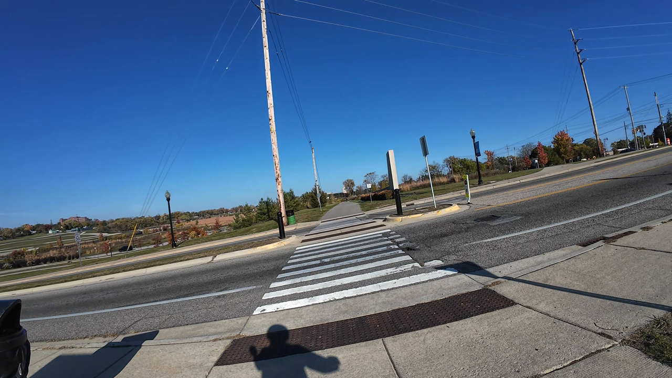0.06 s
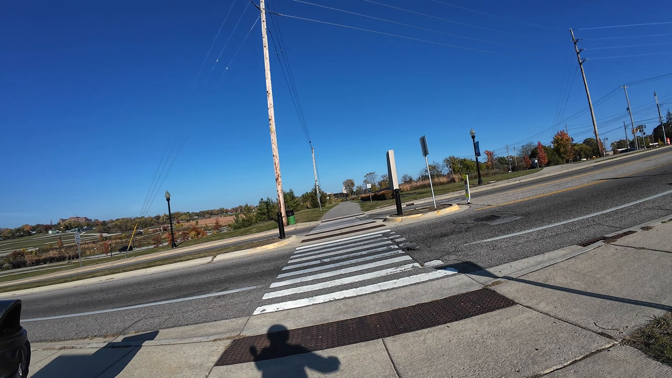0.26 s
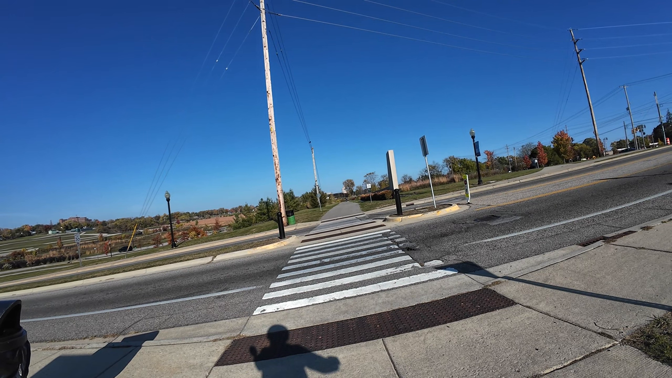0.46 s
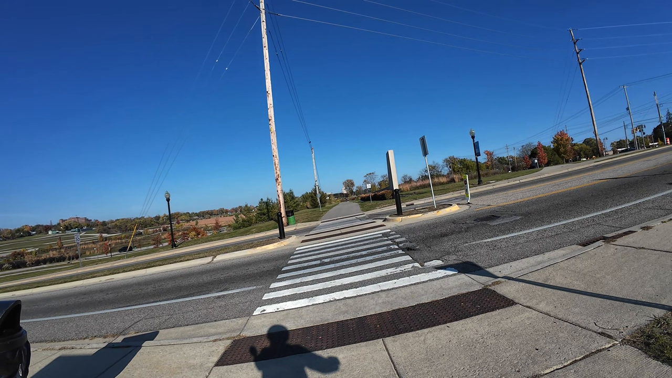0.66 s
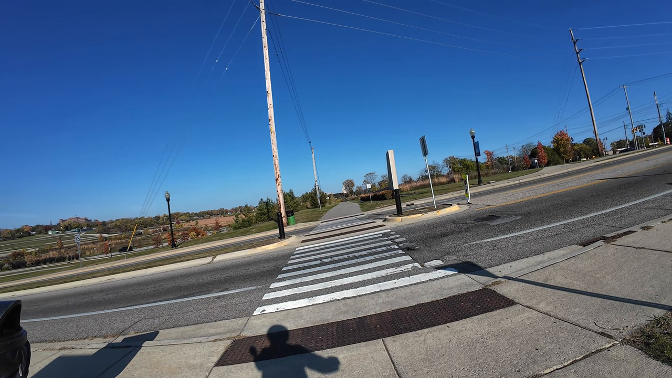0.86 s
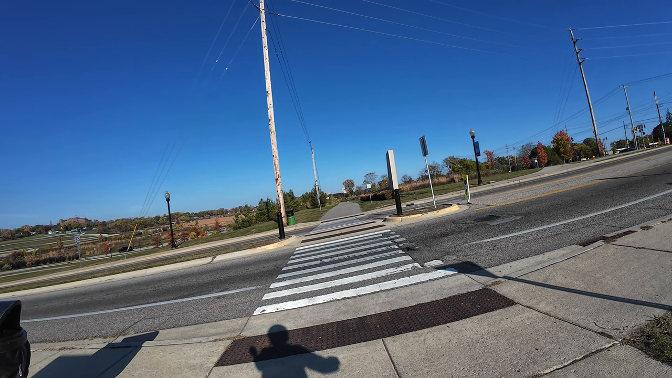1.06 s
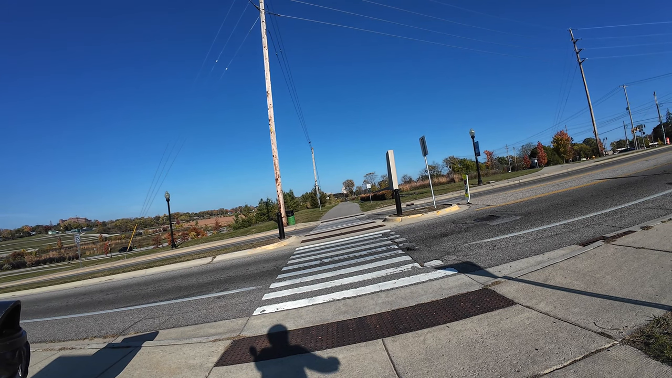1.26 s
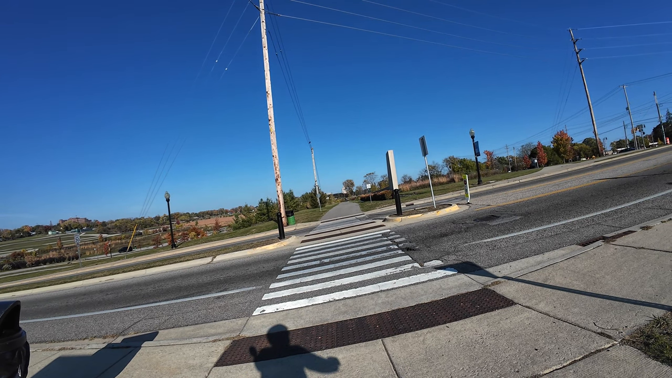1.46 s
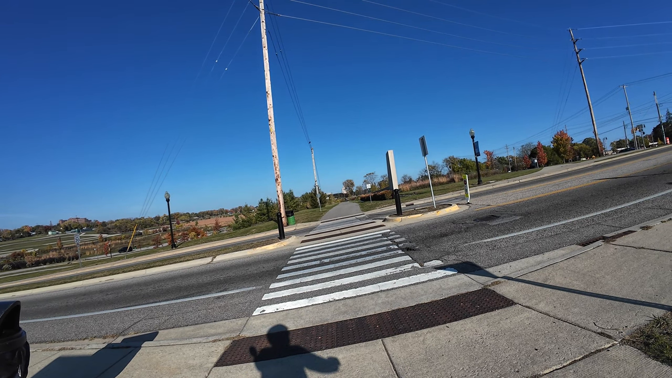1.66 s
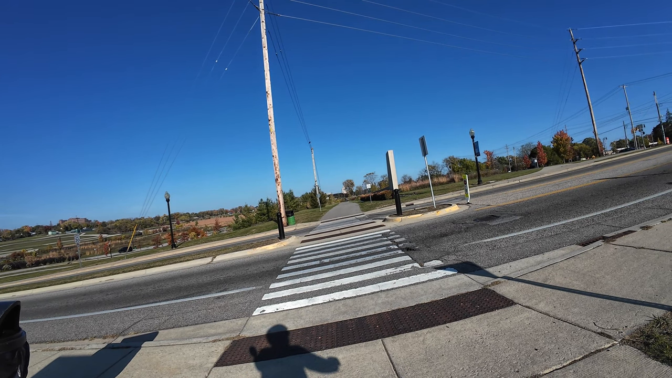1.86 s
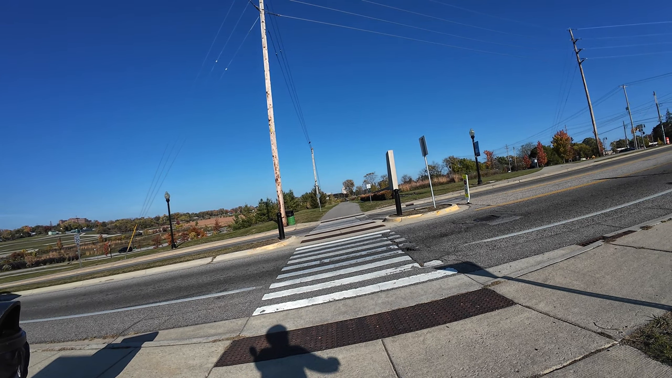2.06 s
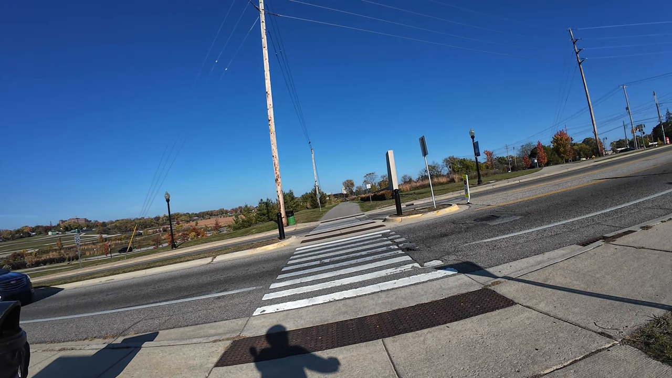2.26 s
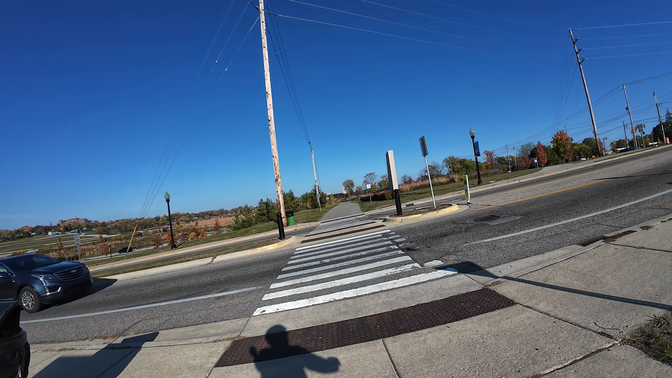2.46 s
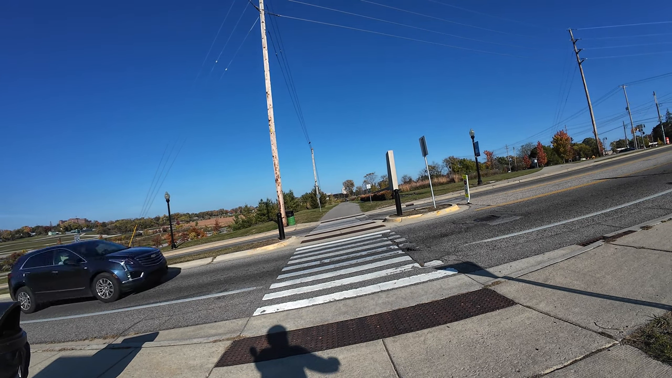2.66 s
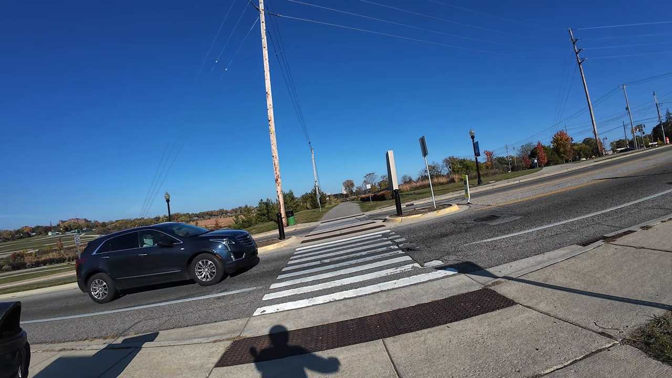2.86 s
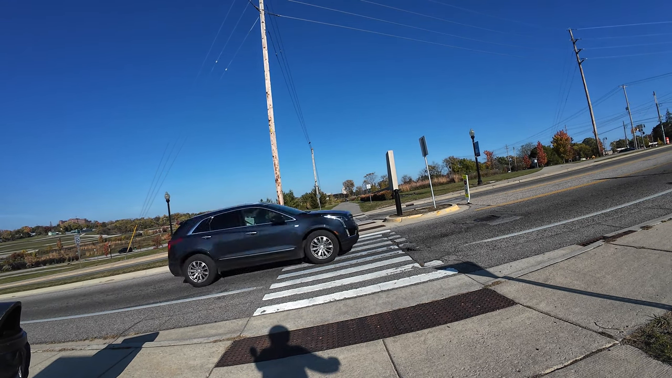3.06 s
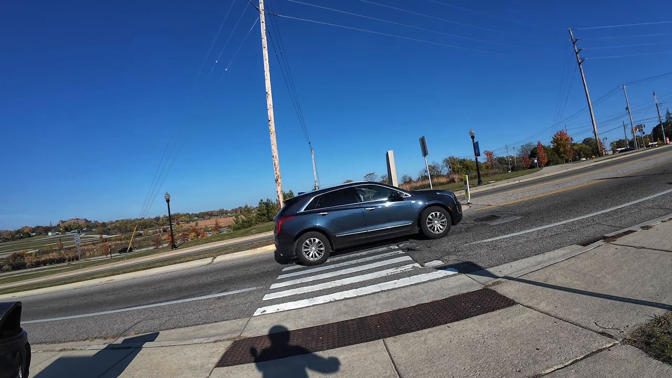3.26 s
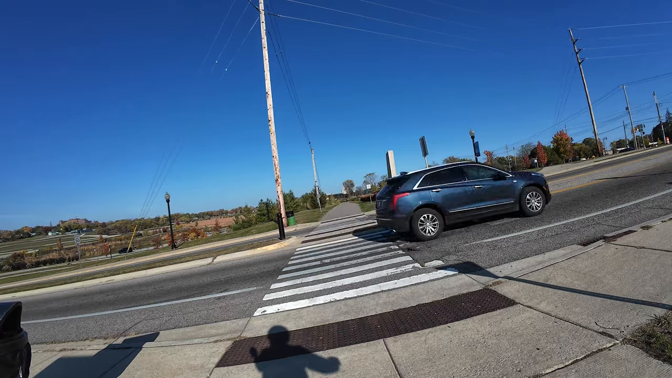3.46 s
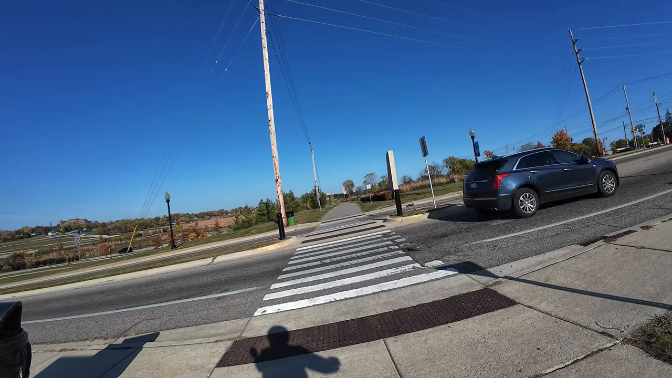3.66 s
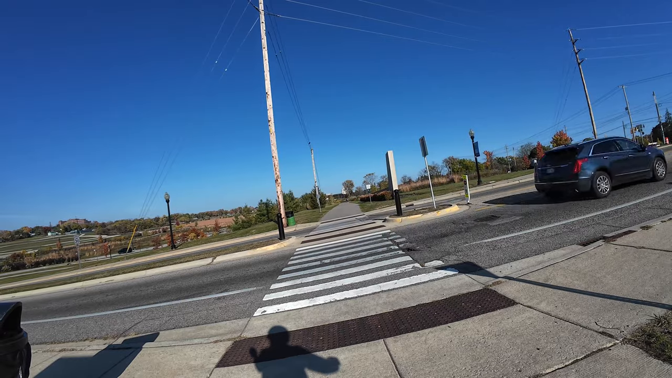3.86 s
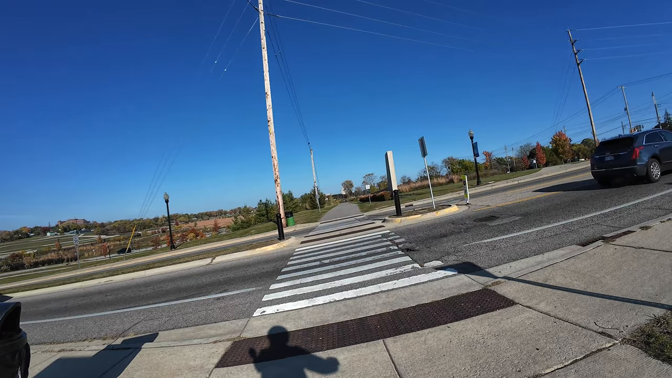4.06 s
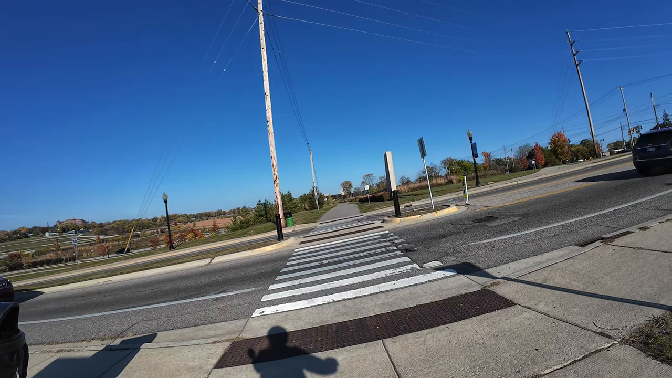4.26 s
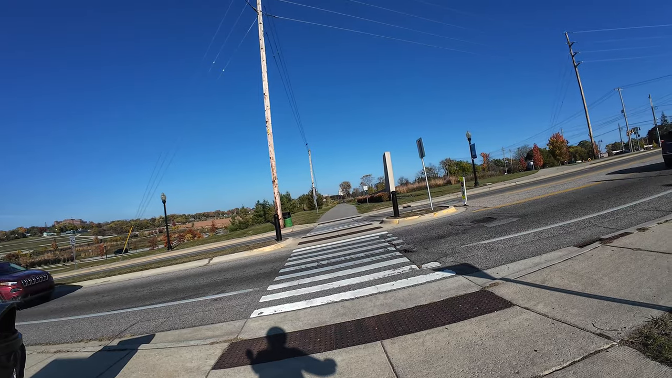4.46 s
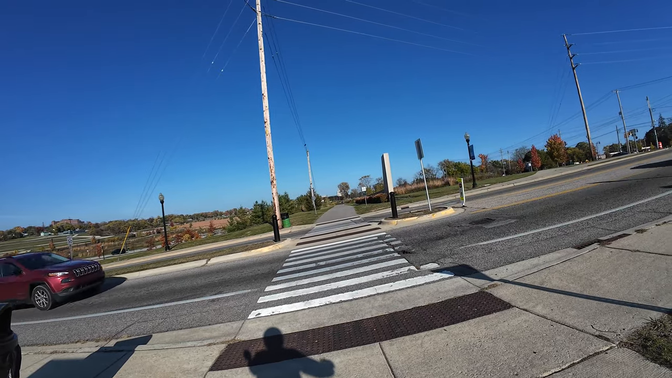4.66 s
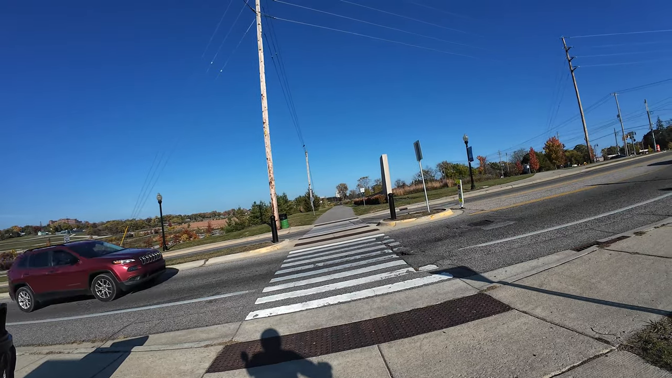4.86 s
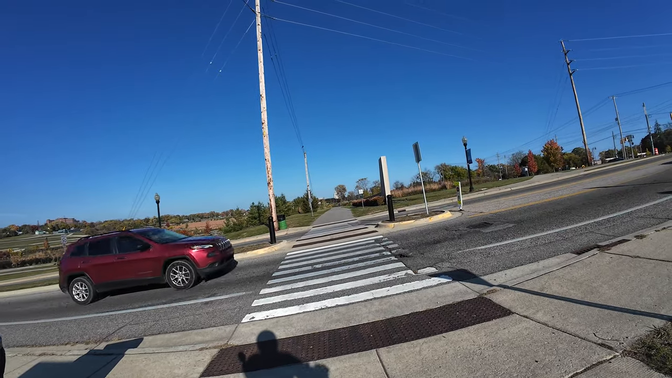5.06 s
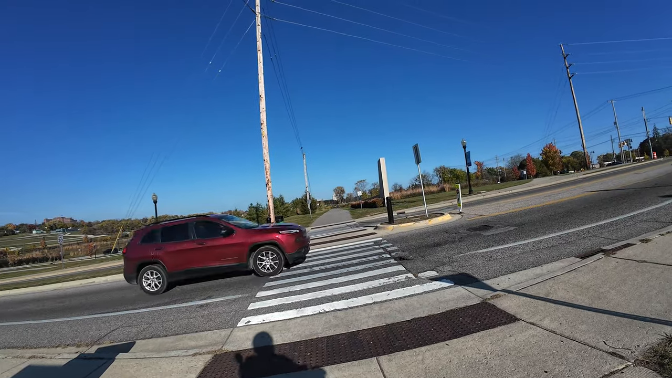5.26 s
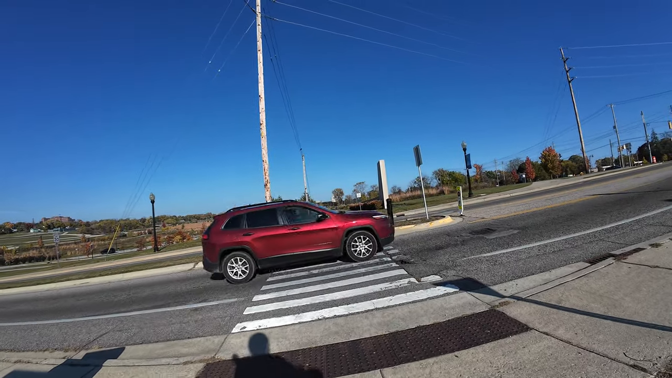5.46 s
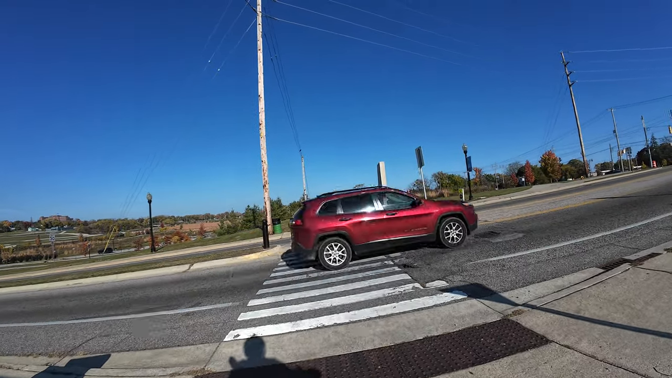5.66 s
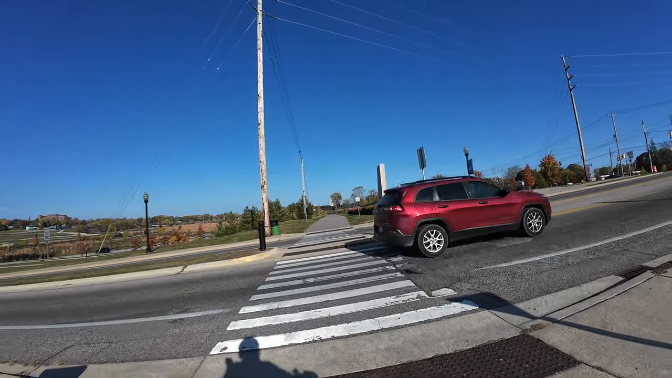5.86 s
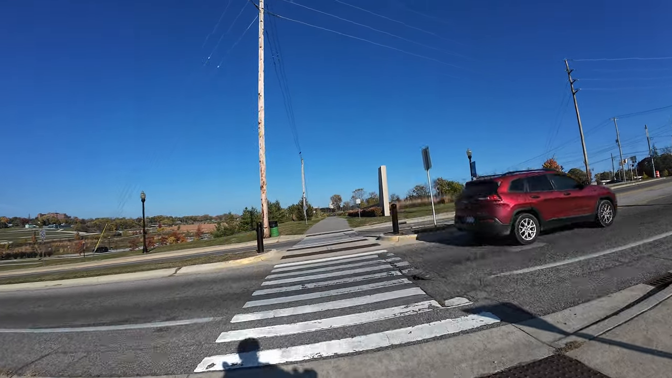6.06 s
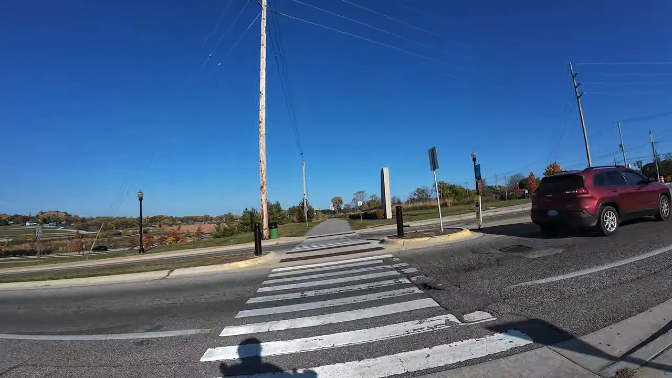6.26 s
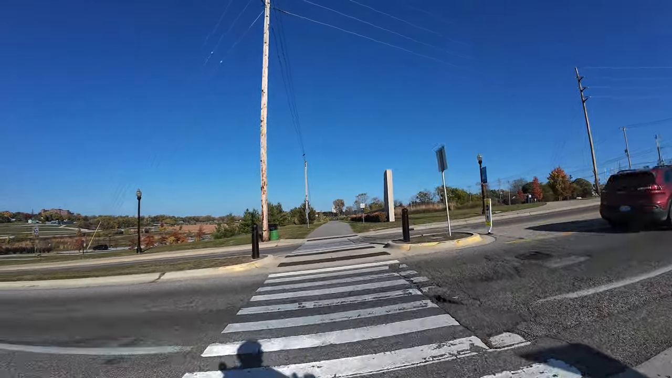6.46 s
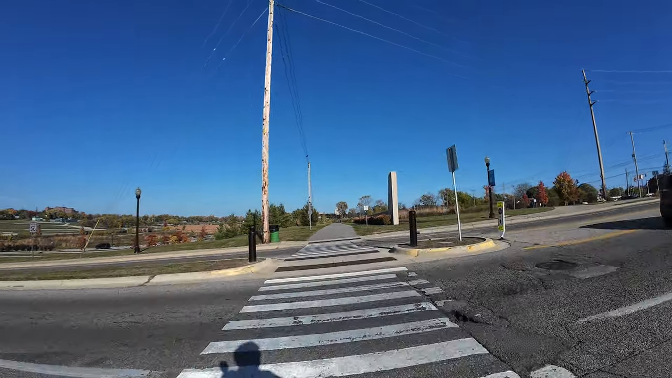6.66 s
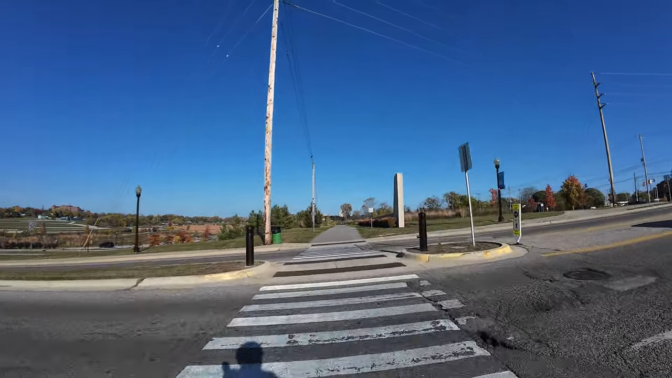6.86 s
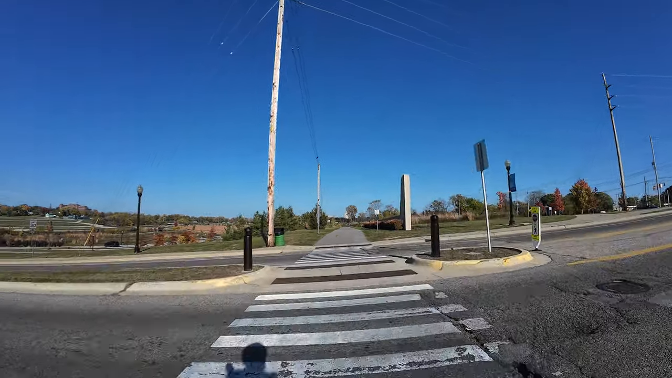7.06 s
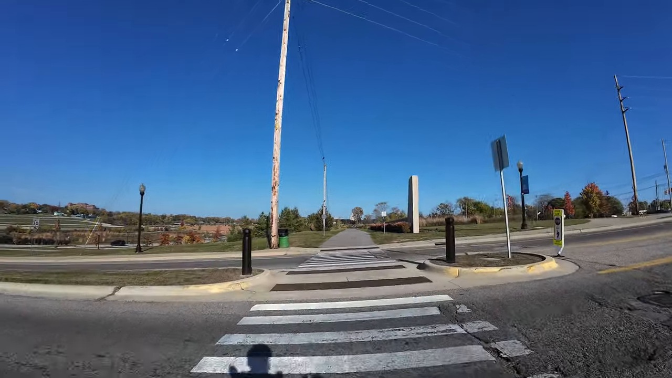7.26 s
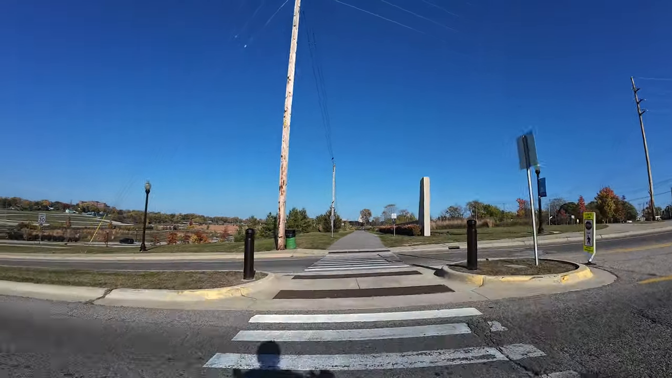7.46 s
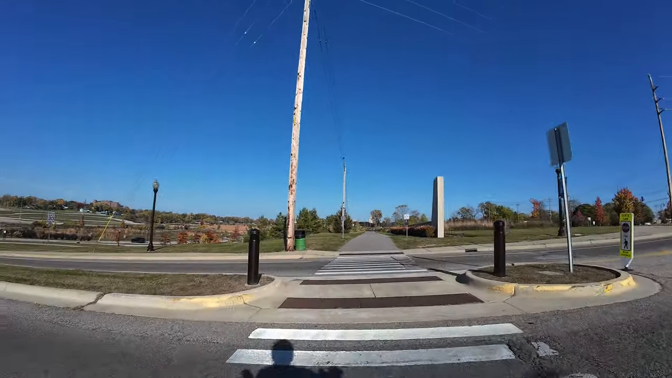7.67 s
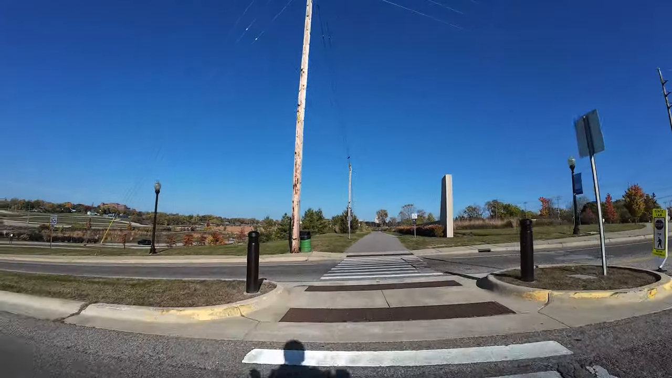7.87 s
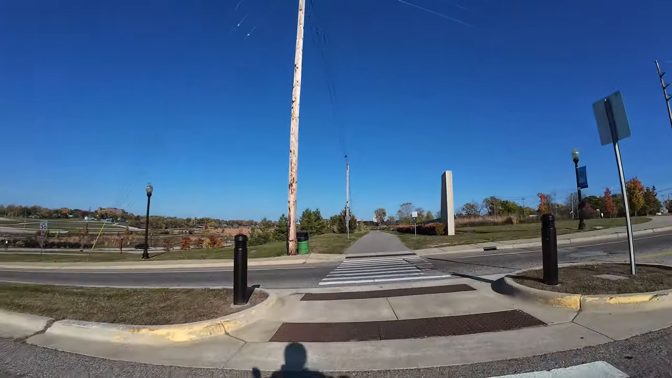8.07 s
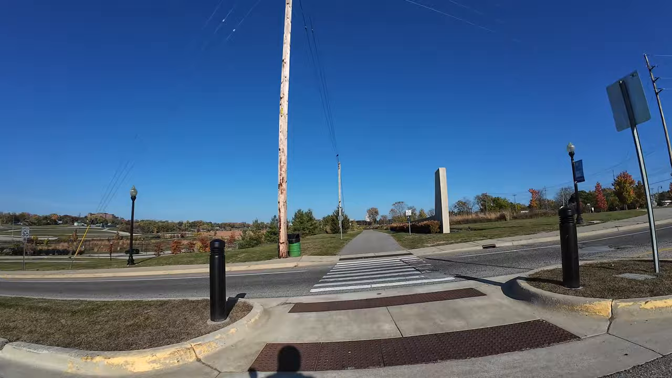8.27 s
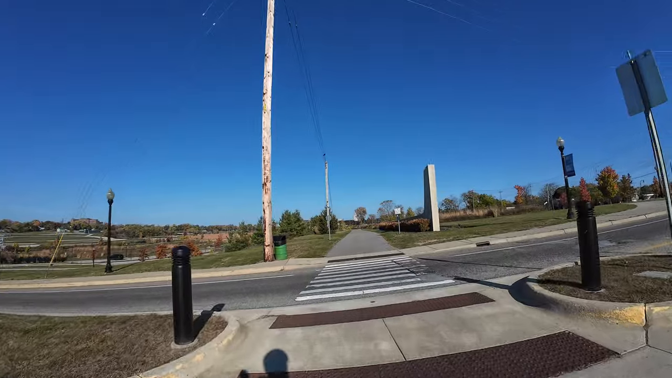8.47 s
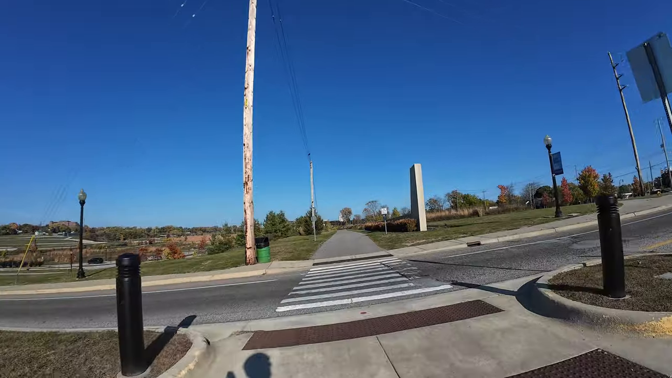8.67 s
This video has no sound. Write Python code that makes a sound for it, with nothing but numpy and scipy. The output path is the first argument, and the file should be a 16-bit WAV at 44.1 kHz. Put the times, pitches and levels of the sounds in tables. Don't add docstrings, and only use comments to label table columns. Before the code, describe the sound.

Two cars swish past left to right over a thumping road seam, then a bike rolls off with motor whine, tyre hum and throbbing wind.

```python
import sys
import numpy as np
from scipy import signal
from scipy.fft import rfft, irfft, next_fast_len
from scipy.io import wavfile
from scipy.ndimage import map_coordinates

SR = 44100
rng = np.random.default_rng(int(sys.argv[2]) if len(sys.argv) > 2 else 0)


def output_pcm(signal):
    pcm = np.clip(np.atleast_2d(signal).T, -1, 1) * 32767
    wavfile.write(sys.argv[1], SR, np.round(pcm).astype(np.int16))


def invert_db(level):
    return 10 ** (np.asarray(level, dtype=float) / 20)


N = 384111
STEP_S = .005


def rms_one(x):
    return x / np.sqrt(np.mean(x ** 2) + 1e-20)


def coarse():
    return np.arange(0, N / SR + STEP_S, STEP_S)


def in_time(rows):
    s, *columns = np.transpose(rows)
    return [np.interp(np.arange(N) / SR, s, c) for c in columns]


def while_on(rows, fade_s=0.1):
    t = np.arange(N) / SR
    return np.clip(np.minimum(t - rows[0][0], rows[-1][0] - t) / fade_s + .5, 0, 1)


def at_hz(points, hz):
    point_hz, value = np.transpose(points)
    return np.interp(np.log(hz), np.log(point_hz), value)


def band(x, low_hz, high_hz, order=2):
    edges = [low_hz, min(high_hz, .45 * SR)]
    return signal.sosfilt(signal.butter(order, edges, "band", fs=SR, output="sos"), x)


def noise_band(low_hz, high_hz):
    return rms_one(band(rng.standard_normal(N), low_hz, high_hz))


def drift(rate):
    r = np.exp(-80 * np.pi * rate / SR)
    slow = signal.lfilter([1], [1, -2 * r, r * r], rng.standard_normal(N // 40 + 2002))[2000:]
    return np.interp(np.arange(N) / 40, np.arange(len(slow)), rms_one(slow))


def sine(hz):
    return np.sin(2 * np.pi * np.cumsum(hz) / SR)


def wavering(hz, width_hz):
    turn = np.exp(2j * np.pi * np.cumsum(hz) / SR)
    return rms_one(np.real(turn * (drift(width_hz) + 1j * drift(width_hz))))


def glides(rows):
    out = np.zeros(N)
    for s, length, from_hz, to_hz, db in rows:
        n = round(length * SR)
        out[round(s * SR):][:n] += invert_db(db) * np.hanning(n) * sine(np.geomspace(from_hz, to_hz, n))
    return out


def delayed(x, samples):
    return map_coordinates(x, [np.arange(N) - samples], order=3, mode="nearest")


def two_ports(pair, lag):
    return np.array([delayed(pair[0], lag / 2), delayed(pair[1], -lag / 2)])


# moment abreast of the microphone in seconds, speed in m/s,
# lane distance in m, extra lateness of the three lower layers in seconds.
CARS = [
    (-.02, 27.4, 3.06, .01),
    (3.3, 9.12, 6.04, .01),
    (5.65, 8.75, 6.72, .2),
    (8.8, 16, 9.7, 0.012),
]


def along(car, after_s=0):
    s, speed, lane, _ = CARS[car]
    return (coarse() - s - after_s) * speed / lane


# body, roar, song, swish and hiss level, all in dB.
CAR_DB = [
    (-47.5, -33.5, -46, -48, -86.5),
    (-39.5, -28, -38.5, -40.5, -63.5),
    (-32, -30.5, -35.5, -41, -62),
    (-45, -45.5, -41, -58.5, -89),
]
# loudest after abreast in seconds, loss coming and loss going
# in dB per doubled distance, distant traffic level in dB.
LAYERS = [
    (.25, 11, 4.7, -45.5),
    (0.09, 8, 6.1, -51.5),
    (0.23, 3.5, 12.8, -51),
    (-0.059, 8, 10.7, -61),
    (0.093, 12.5, 12, -95.5),
]
HALF_LENGTH_M = 0.63
BODY, ROAR, SONG, SWISH, HISS = range(5)


def car_power(car, layer):
    after_s, coming_db, going_db, _ = LAYERS[layer]
    _, _, lane, late_s = CARS[car]
    x = along(car, after_s + late_s * (layer in (BODY, ROAR, SONG)))
    gap = np.maximum(np.abs(x) - HALF_LENGTH_M / lane, 0)
    doublings = np.log2(1 + gap ** 2) / 2
    return invert_db(2 * (CAR_DB[car][layer] - np.where(x < 0, coming_db, going_db) * doublings))


# start in seconds, level in dB.
RUMBLES = [
    (3.32, -30),
    (3.56, -31.5),
    (5.65, -30),
    (5.89, -28),
]
RUMBLE_FALL_DB_PER_S = 32
# level in dB of body, roar, song, swish and hiss.
ROLL_DB = (-38.5, -45.5, -55, -62.5, -75.5)
ROLL_FROM_S, ROLL_UP_S = 4.7, 0.37


def traffic_db():
    t = coarse()
    rolling = np.clip((t - ROLL_FROM_S) / ROLL_UP_S, 0, 1)
    power = []
    for layer in range(len(LAYERS)):
        cars = sum(car_power(car, layer) for car in range(len(CARS)))
        power.append(cars + invert_db(2 * LAYERS[layer][-1]) + rolling * invert_db(2 * ROLL_DB[layer]))
    for s, db in RUMBLES:
        power[BODY] += invert_db(2 * (db - RUMBLE_FALL_DB_PER_S * (t - s))) * (t > s)
    return in_time(np.transpose([t, *(10 * np.log10(power))]))


PORT_LAG_SAMPLES = 2.4


def bearings():
    lags = [PORT_LAG_SAMPLES * x / np.hypot(1, x) for x in (along(1), along(2))]
    first, second = car_power(1, SWISH), car_power(2, SWISH)
    return in_time(np.transpose([coarse(), *lags, second / (first + second)]))


def rolling_noise(first_lag, second_lag, share):
    first, second, loose = rng.standard_normal((3, N))
    first_gain, second_gain = np.sqrt(1 - share), np.sqrt(share)
    left = first_gain * delayed(first, first_lag) + second_gain * delayed(second, second_lag)
    return np.array([left, first_gain * first + second_gain * second, loose])


# frequency in Hz, level in dB per Hz.
TYRES = [(70, -12), (180, -5.5), (330, -10), (560, -9.5), (800, -6), (1150, -8), (1650, -12), (2150, -20),
         (3000, -25.5), (5000, -36.5), (7000, -48.5), (8200, -44.5), (11500, -45.5), (14800, -52.5)]
# low edge in Hz, high edge in Hz.
LAYER_HZ = [
    (100, 400),
    (450, 1200),
    (1250, 1800),
    (1900, 4000),
    (5500, 7400),
]
# frequency in Hz, left-right likeness from 0 to 1.
LIKENESS = [(300, .999), (800, 0.98), (1500, 0.95), (2500, 0.99), (4000, 0.86), (9000, 0.87)]
# time in seconds, first ridge in Hz, strength from 0 to 1.
ROAD_ECHO = [(0, 905, 0.13), (1.2, 796, 0.19), (3.2, 845, 0.11), (3.55, 710, 0.18), (4.1, 844, 0.08),
             (5.0, 973, 0.05), (5.9, 860, 0), (6.7, 920, 0), (7.3, 712, 0.15), (8.71, 910, 0.15)]
FAR_DULL_DB = 0.3


def tyre_roar(white, patchy_db, echo_cut_hz):
    layers_db = traffic_db()
    ridge_hz, echo = in_time(ROAD_ECHO)
    edges = 60 * 2 ** np.arange(0, 8.1, 1 / 3)
    hz = np.sqrt(edges[1:] * edges[:-1])
    level_db = at_hz(TYRES, hz) + 10 * np.log10(np.diff(edges))
    shift_db = []
    for db, (low_hz, high_hz) in zip(layers_db, LAYER_HZ):
        inside = (hz > low_hz) & (hz < high_hz)
        shift_db.append(db - 10 * np.log10(np.sum(invert_db(2 * level_db[inside]))))
    shift_db.append(shift_db[HISS] + FAR_DULL_DB * (layers_db[HISS] - layers_db[HISS].max()))
    place = np.interp(np.log(hz), np.log([200, 760, 1500, 2700, 6400, 10000]), np.arange(6))
    together, out = drift(3.6), 0
    for k, spot in enumerate(place):
        below = min(int(spot), 4)
        moved_db = shift_db[below] + (spot - below) * (shift_db[below + 1] - shift_db[below])
        *ports, loose = rms_one(band(white[k % 2], edges[k], edges[k + 1], order=3))
        alike = at_hz(LIKENESS, hz[k])
        gain = invert_db(level_db[k] + moved_db + patchy_db * (together / 2 + drift(8.4)))
        shared = np.sqrt((1 + alike) / 2) * np.array(ports)
        opposed = np.sqrt((1 - alike) / 2) * loose * np.array([[1], [-1]])
        out = out + gain * (shared + opposed)
    bounce = band(out, 89, echo_cut_hz, order=1)
    late = np.array([delayed(port, SR / ridge_hz) for port in bounce])
    return (out + echo * late) / np.sqrt(1 + echo ** 2)


# time in seconds, firing rate in Hz, level in dB.
ENGINE_ONE = [(2.8, 55.8, -38), (2.97, 56.1, -38.5), (3.12, 55.4, -35), (3.33, 55.9, -33.5),
              (3.59, 55.6, -25.5), (3.75, 55, -47)]
# time in seconds, firing rate in Hz.
ENGINE_TWO = [(5.15, 54.38), (5.41, 56.07), (5.63, 59.26), (5.71, 58.72), (6.05, 53.84), (6.34, 52.37),
              (6.6, 50.4)]
# multiple of the firing rate,
# loudest moment in seconds, level in dB, rise in dB/s, fall in dB/s.
BEAMS = [
    (1, 5.45, -27.5, 36, 3),
    (2, 5.71, -23.5, 250, 28),
    (3, 5.52, -29.5, 40, 8),
    (5, 5.47, -36.5, 35, 6),
    (6, 5.7, -31.5, 50, 54),
]


def engines():
    hz, db = in_time(ENGINE_ONE)
    out = while_on(ENGINE_ONE) * invert_db(db) * np.sqrt(2) * sine(hz)
    hz, = in_time(ENGINE_TWO)
    t = np.arange(N) / SR
    unsteady_hz = hz * (1 + 0.0041 * drift(6.5))
    for multiple, s, top_db, rise, fall in BEAMS:
        db = top_db - np.maximum(rise * (s - t), fall * (t - s))
        out += while_on(ENGINE_TWO) * invert_db(db) * np.sqrt(2) * sine(multiple * unsteady_hz)
    return out


# start in seconds, slap peak in dB, pitch in Hz,
# 60 dB decay in seconds, crack level in dB.
THUMPS = [(3.17, -10, 817, 0.032, -18), (3.317, -14.5, 440, 0.053, -15), (3.346, -12, 664, 0.048, -22),
          (3.532, -0.5, 426, 0.012, -13), (3.555, -10, 668, 0.057, -34), (5.641, -9, 369, 0.033, -20),
          (5.67, -16, 250, 0.025, -16), (5.715, -15, 385, 0.056, -35), (5.965, -12, 806, 0.037, -15)]


def thumps():
    out, t = np.zeros(N), np.arange(round(.15 * SR)) / SR
    crack = band(np.sin(2 * np.pi * t / 0.00085) * (t < .0009), 290, 2800)
    knock = invert_db(-20.0) * np.sin(2 * np.pi * 140 * t) * invert_db(-60 * t / 0.04)
    for s, db, hz, t60, crack_db in THUMPS:
        slap = np.sin(2 * np.pi * hz * t) * invert_db(-60 * t / t60) * (1 - np.exp(-t / 0.001))
        out[round(s * SR):][:len(t)] -= invert_db(db) * (slap + knock) + invert_db(crack_db) * crack
    return out


# centre in seconds, peak in dB, length in seconds.
GRIT = [(3.4, -50.5, 0.02), (3.542, -47, 0.0061), (3.65, -52, 0.02), (5.667, -45.5, 0.0096),
        (5.95, -39.5, 0.018), (6.134, -49, 0.01)]


def grit():
    t = np.arange(N) / SR
    swell = sum(invert_db(db) * np.exp(-.5 * ((t - s) / length) ** 2) for s, db, length in GRIT)
    spray = rms_one(band(rng.standard_normal((2, N)), 4500, 14500))
    return swell * (0.71 * spray[0] + .3 * spray[1] * np.array([[1], [-1]]))


# time in seconds, pitch in Hz, level in dB.
WHINE = [(6.03, 259, -38), (6.08, 263.5, -33.5), (6.244, 302.7, -28.5), (6.446, 334, -32.5),
         (6.572, 386, -33), (6.63, 395, -44), (6.7, 405, -55)]


def motor_whine():
    hz, db = in_time(WHINE)
    return while_on(WHINE) * invert_db(db) * np.sqrt(2) * sine(hz * (1 + 0.0053 * drift(21.8)))


# time in seconds, pitch in Hz, level in dB.
HUM = [(6.75, 190, -33), (7.0, 169.3, -36), (7.15, 188, -38.5), (7.32, 186, -29), (7.55, 186.3, -34),
       (7.84, 191, -30), (8.21, 183.4, -36), (8.41, 191, -34.5), (8.71, 190, -26)]


def knob_hum():
    hz, db = in_time(HUM)
    lines = 1.1 * sine(hz + 4.0 * drift(9.1)) + .55 * wavering(hz, width_hz=15.0)
    lines += 0.44 * wavering(.81 * hz, width_hz=3.5) + .4 * wavering(1.36 * hz, width_hz=14.0)
    return while_on(HUM, fade_s=0.69) * invert_db(db - 3.5) * lines


# start in seconds, peak in dB, low edge in Hz,
# high edge in Hz, 60 dB decay in seconds.
CLICKS = [(2.11, -76.5, 9450, 13600, .02), (6.4575, -21, 2157, 2424, 0.031),
          (6.4605, -25, 3840, 4540, 0.016), (6.459, -25.5, 2400, 5200, 0.066),
          (6.4605, -32.5, 6040, 10000, 0.02), (6.5473, -23.5, 1500, 4940, 0.018),
          (6.5445, -31.5, 7000, 13160, 0.017), (7.4446, -44, 2600, 5200, .03),
          (7.45, -35.5, 2600, 3720, 0.07), (7.635, -54, 7000, 12000, .01), (7.707, -50, 4500, 8040, 0.016),
          (7.85, -48, 2520, 4500, .015), (8.0, -53, 4000, 6500, 0.033), (8.308, -31.5, 6000, 11400, 0.0067),
          (8.321, -50, 7500, 11000, 0.0089), (8.334, -50, 7500, 11900, .01),
          (8.5675, -46, 2500, 6500, 0.028)]


def clicks():
    out, t = np.zeros((2, N)), np.arange(round(.08 * SR)) / SR
    for s, db, low_hz, high_hz, t60 in CLICKS:
        centre, spread = rng.standard_normal((2, len(t)))
        noise = centre + 0.29 * spread * np.array([[1], [-1]])
        burst = band(noise * invert_db(-60 * t / t60) * np.minimum(t / 0.0011, 1), low_hz, high_hz)
        start = round(s * SR)
        out[:, start:start + len(t)] += invert_db(db) * burst / np.abs(burst).max()
    return out


# centre in seconds, throb in dB, buffet in dB, half length in seconds.
GUSTS = [(0.39, -31, -27, 0.024), (0.763, -25.5, -25, 0.013), (.96, -27.5, -28, 0.092),
         (1.24, -33.5, -28.5, 0.093), (1.61, -25.5, -28, 0.024), (2.27, -36, -29, 0.34),
         (3.13, -32.5, -37, 0.034), (3.498, -42, -30, .1), (3.93, -27.5, -32, 0.063),
         (4.268, -30, -23.5, .06), (4.487, -25.5, -26.5, 0.022), (4.611, -23.5, -20.5, 0.028),
         (4.85, -33.5, -39, 0.24), (5.168, -17, -26.5, .025), (5.308, -24.5, -27, 0.045),
         (5.53, -24, -40, .04), (5.673, -30, -23, 0.059), (5.926, -20.5, -36, 0.049),
         (6.12, -25, -22.5, .04), (6.283, -22.5, -28.5, 0.05), (6.498, -17, -37, 0.016),
         (6.67, -15.5, -38, 0.095), (6.935, -14, -23.5, 0.087), (7.231, -13, -24.5, .045),
         (7.469, -18.5, -27, 0.055), (7.717, -16, -34.5, 0.11), (8.031, -17, -34, 0.038),
         (8.153, -18, -36, .06), (8.387, -16.5, -42, 0.056), (8.623, -19, -34, 0.057)]
LULL_THROB_DB, LULL_BUFFET_DB, LULL_SWAY_DB = -60, -35, -41


def gusts_db():
    s, throb_db, buffet_db, length = np.transpose(GUSTS)
    bells = np.exp(-((coarse()[:, None] - s) / length) ** 2)
    throb = 10 * np.log10(bells @ invert_db(2 * throb_db) + invert_db(2 * LULL_THROB_DB))
    buffet = 10 * np.log10(bells @ invert_db(2 * buffet_db) + invert_db(2 * LULL_BUFFET_DB))
    return in_time(np.transpose([coarse(), throb, buffet]))


BUFFET_LUMPS_DB = 2.5
STANDING_WANDER_HZ = 6.0


def wind():
    throb_db, buffet_db = gusts_db()
    standing = np.arange(N) / SR < ROLL_FROM_S
    sway = invert_db(LULL_SWAY_DB + 1.9 * drift(3.1)) * noise_band(18, 52)
    throb_hz = 32.5 + 3.0 * drift(3.0) + standing * STANDING_WANDER_HZ * (1 + drift(4.086))
    throb = np.sqrt(2) * sine(throb_hz) + 0.47 * noise_band(8.3, 24)
    buffet = invert_db(buffet_db - 4.0 + BUFFET_LUMPS_DB * drift(5.0)) * noise_band(44.7, 88.8)
    return sway + invert_db(throb_db - 2.3) * throb + buffet


# start in seconds, length in seconds,
# from pitch in Hz, to pitch in Hz, level in dB.
WHOOP = [
    (5.04, 0.17, 122, 70.2, -21),
    (5.13, .08, 66, 27.2, -16.5),
]


def whoop():
    return glides(WHOOP)


# time in seconds, level in dB.
CRICKET = [(0, -71.5), (2.5, -68), (5.0, -71), (6.4, -68.5), (8.71, -88)]
CHIRPS_PER_S, FIRST_CHIRP_S = 14.85, .056


def cricket():
    db, = in_time(CRICKET)
    cycle = ((np.arange(N) / SR - FIRST_CHIRP_S) * CHIRPS_PER_S + .5) % 1 - .5
    pulse = np.exp(-.5 * (cycle / .085) ** 2) * invert_db(1.5 * drift(6.0))
    tone = np.sqrt(2) * sine(7930 - 250 * cycle + 30 * drift(20.0))
    return invert_db(db) * (pulse * tone + 0.26 * noise_band(7650, 8150))


# start in seconds, length in seconds, from pitch in Hz, to pitch in Hz, level in dB.
BIRD = [
    (.0, 0.09, 8760, 6300, -68),
    (2.15, 0.087, 4840, 4600, -62),
]


def bird():
    return glides(BIRD)


def scene():
    first_lag, second_lag, share = bearings()
    white = [rolling_noise(first_lag, second_lag, share) for _ in range(2)]
    cars = tyre_roar(white, patchy_db=1.18, echo_cut_hz=2600)
    nearer_lag = np.where(share < .5, first_lag, second_lag)
    cars += two_ports(engines() + thumps() + grit(), nearer_lag)
    bike = motor_whine() + knob_hum() + clicks()
    grass = (cricket() + bird()) * invert_db(np.array([[2.1], [-2.1]]))
    hiss = invert_db(-95) * rng.standard_normal((2, N))
    return cars + bike + wind() + whoop() + two_ports(grass, -1.24) + hiss


def roll_off(x):
    return signal.sosfilt(signal.butter(12, 14970, fs=SR, output="sos"), x)


def record(dry):
    size = next_fast_len(N + 4000)
    closed = np.hstack([dry, np.linspace(dry[:, -1], dry[:, 0], size - N).T])
    hz = np.arange(size // 2 + 1) * SR / size + 1
    resonance = 1 + .5 / (1 + ((hz - 13200) / 600) ** 2)
    colour = resonance / np.sqrt((1 + (hz / 14400) ** 24) * (1 + (11 / hz) ** 4))
    left, right = rfft(closed) * colour
    mid = (left + right) / 2
    side = ((left - right) / 2 + 0.031 * mid) * (0.16 + 0.73 / (1 + (330 / hz) ** 4))
    return roll_off(irfft([mid + side, mid - side], size)[:, :N])


dry = scene()
out = record(dry)
output_pcm(out)
```